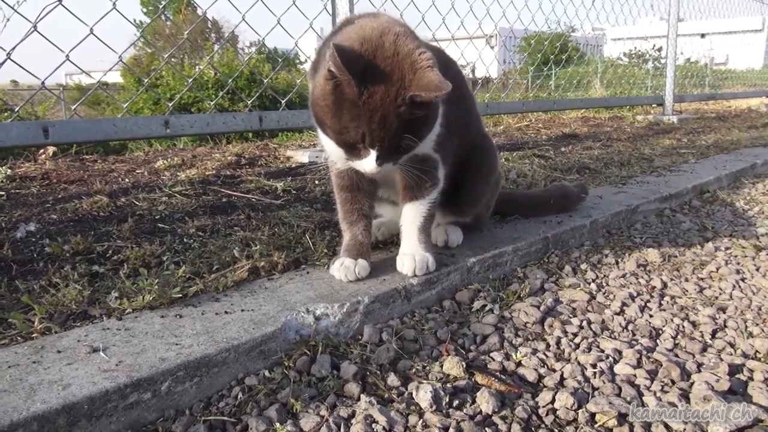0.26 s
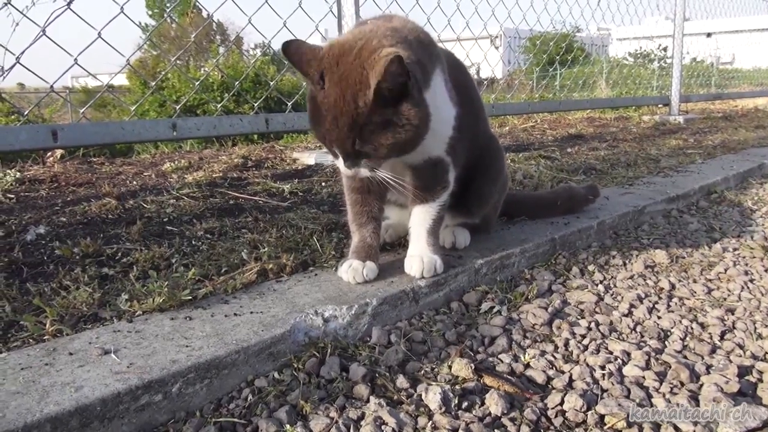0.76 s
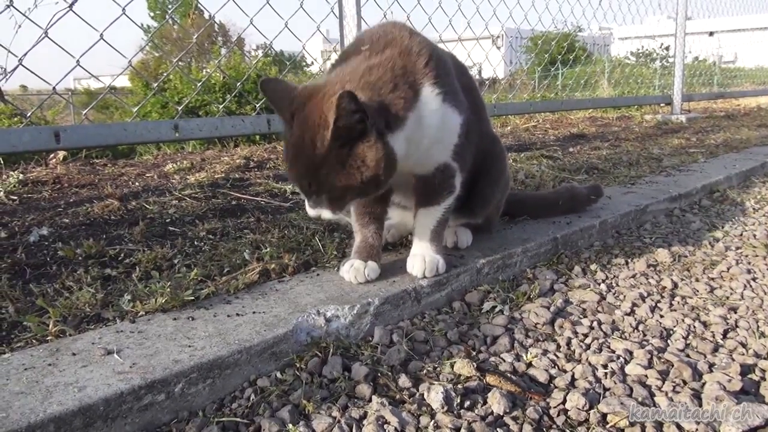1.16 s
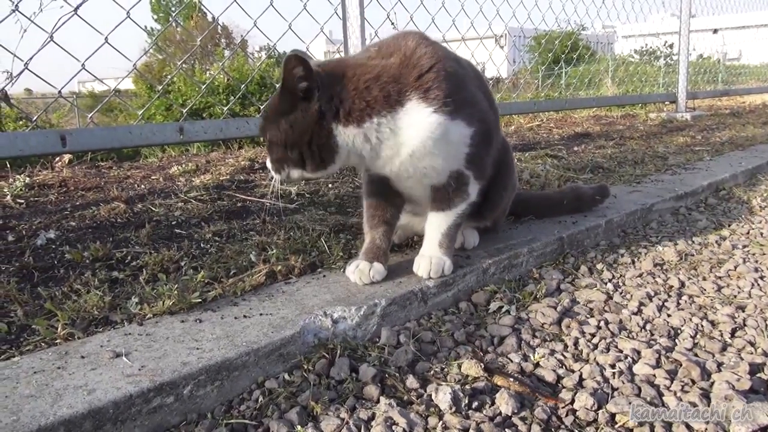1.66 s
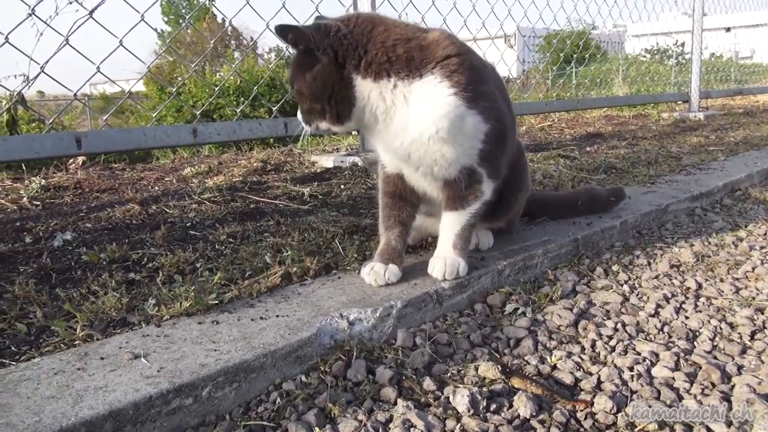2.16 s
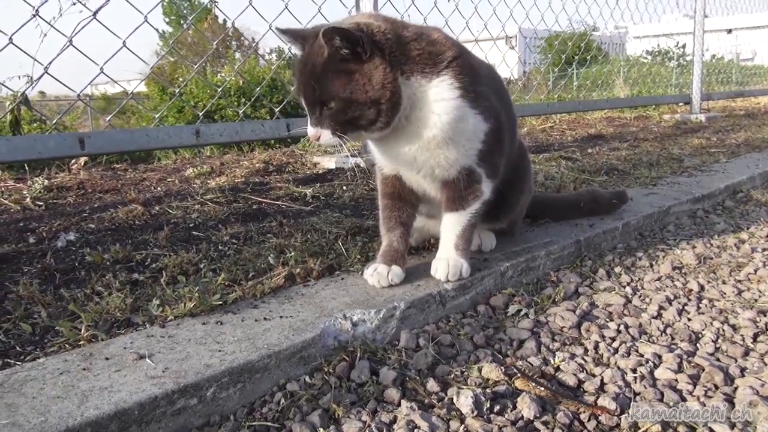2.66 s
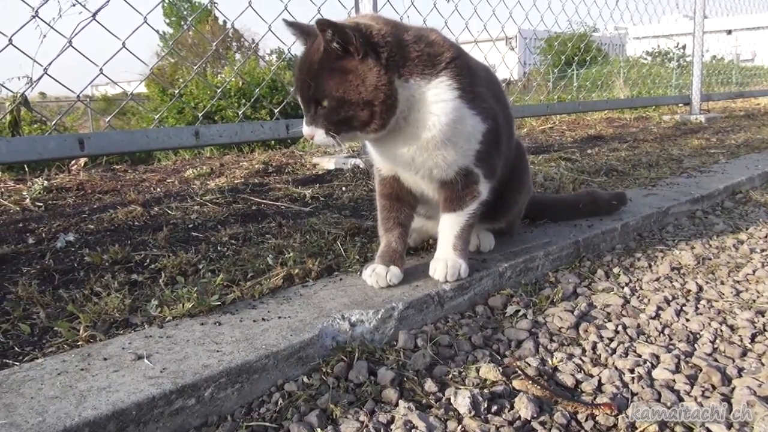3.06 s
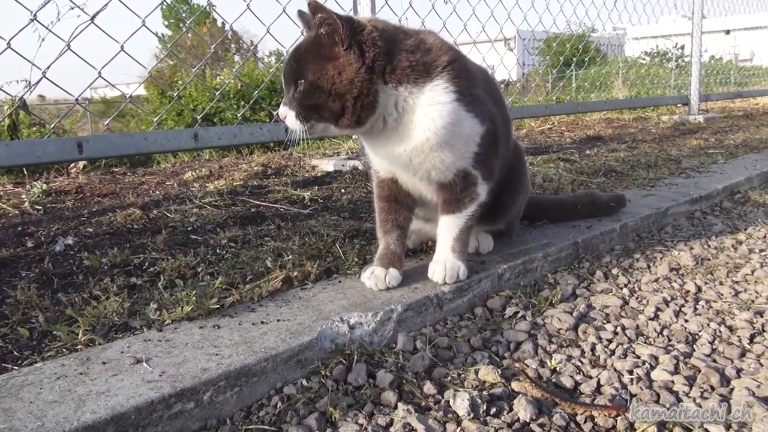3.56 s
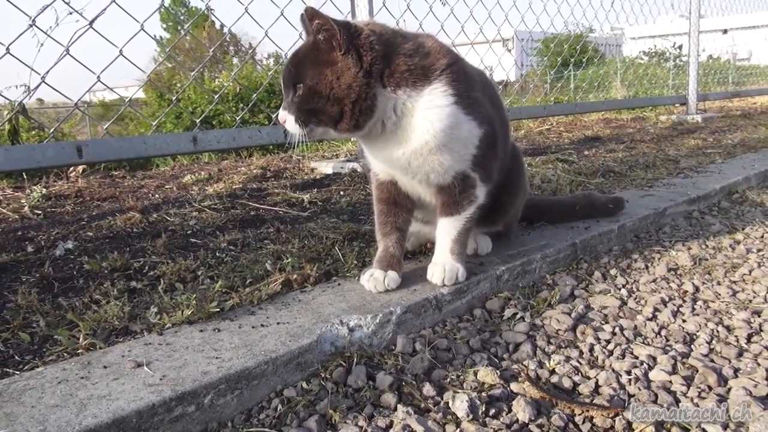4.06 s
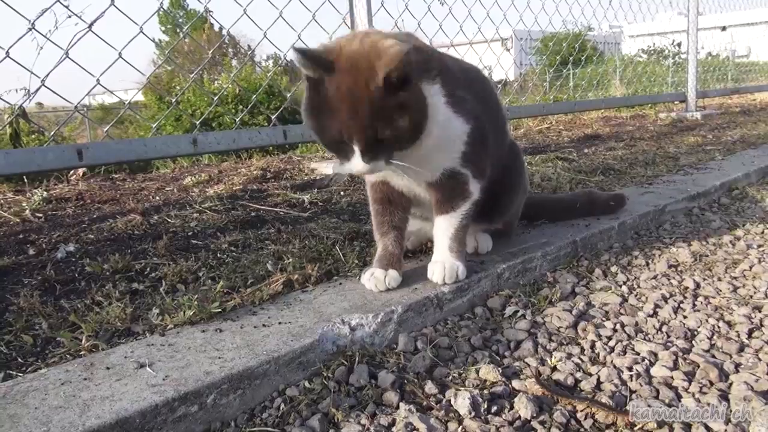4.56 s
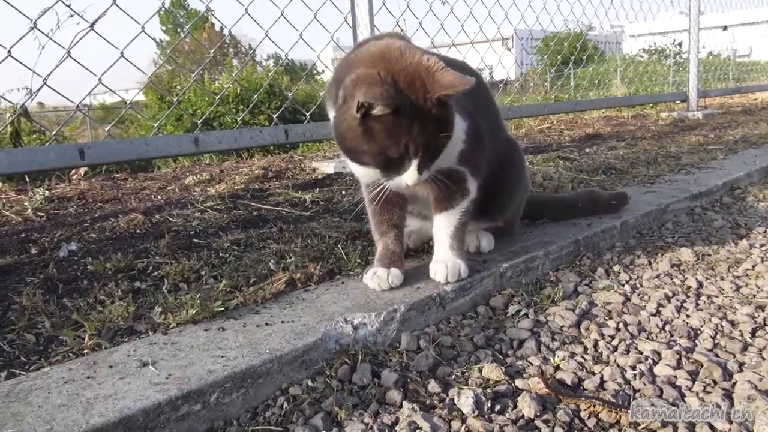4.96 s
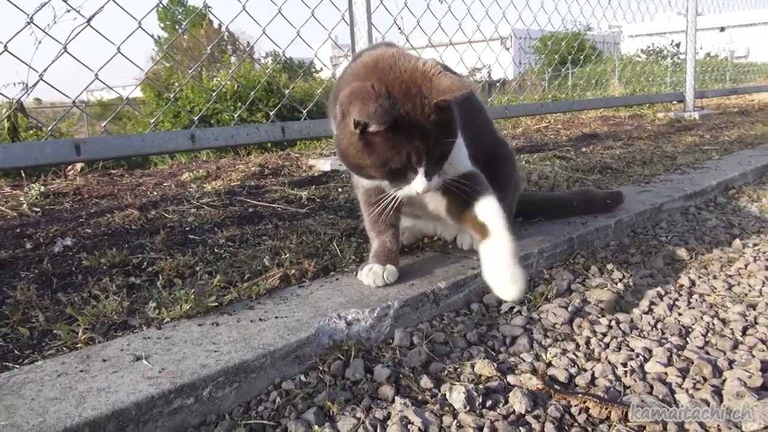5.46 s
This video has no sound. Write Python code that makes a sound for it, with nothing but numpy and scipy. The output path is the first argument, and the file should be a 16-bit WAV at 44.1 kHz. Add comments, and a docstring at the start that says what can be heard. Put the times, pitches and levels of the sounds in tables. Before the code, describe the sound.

In an open yard, low machinery hums and rumbles steadily under small birdsong. A near bird gives a burst of harsh rasping notes, a lower hoarse bird churrs, thin whistles and slurred calls slip between, then a fast even trill of buzzy falling syllables takes over for about a second. Faint chips and dry distant chatter finish. The near bird is close and clear, with a short outdoor tail; the cat is silent.

```python
"""Small birds call by a garden fence: harsh notes, a fast trill of falling syllables, a hoarser low bird,
slurred and two-note calls, single whistles and chips. Each buzz is a train of short rough pulses; each whistle
is a gliding sine, from nearly clear to strongly warbled. Hard ground reflects them and the yard adds a tail.
Behind them machinery hums and rumbles steadily, more birds chatter far away, and one dry tick sounds."""
import sys
import numpy as np
from scipy import signal
from scipy.fft import rfft, irfft
from scipy.io import wavfile
from scipy.ndimage import map_coordinates

SR = 44100
rng = np.random.default_rng(int(sys.argv[2]) if len(sys.argv) > 2 else 0)


def output_pcm(signal):
    """Save a mono or channel-first signal as 16-bit PCM at the path in sys.argv[1].

    Samples are clipped to [-1, 1] before scaling.
    """
    pcm = np.clip(np.atleast_2d(signal).T, -1, 1) * 32767
    wavfile.write(sys.argv[1], SR, np.round(pcm).astype(np.int16))


N = 251370
TIME = np.arange(N) / SR
FREQS = np.maximum(np.fft.rfftfreq(N, 1 / SR), 1)

# course of a harsh note: (share of length, pitch ratio, level [dB], pulse rate ratio)
RASP_SHAPE = [(0, 1.03, 1, .8), (.3, 1, -0.5, 1), (.75, 1.01, -3, 1.08), (1, 1.1, -10, 1.4)]


def undb(db):
    """Decibels to gain."""
    return 10 ** (np.asarray(db) / 20)


def level(x, db):
    """Scale to an rms level."""
    return x * undb(db) / np.sqrt(np.mean(x ** 2))


def spectrum(points):
    """Interpolate (frequency [Hz], level [dB]) points on a log-frequency axis."""
    hz, db = np.transpose(points)
    return np.interp(np.log(FREQS), np.log(hz), db)


def noise(gain):
    """Gaussian noise shaped by a gain per frequency, rms 1."""
    return level(irfft(rfft(rng.standard_normal(N)) * gain, N), 0)


def wander(size, hz):
    """Smooth random curve of spread about 1, with hz random knots a second."""
    knots = np.arange(size) * hz / SR
    return map_coordinates(rng.standard_normal(1024), [knots], order=3, mode="wrap")


def pan(x, db):
    """Place a sound by its left minus right level."""
    return x * undb(np.array([[db], [-db]]) / 2)


def add(out, start_s, x):
    """Mix a sound in at a time."""
    i = max(int(start_s * SR), 0)
    out[..., i:i + x.shape[-1]] += x[..., :max(N - i, 0)]


def machinery():
    """Wavering motor tones, rumble and ringing bands of rushing air, with a soft hiss over everything."""
    # motor tones: (frequency [Hz], mean level [dB])
    tones = [(36.5, -60.5), (67, -58.5), (93.5, -54), (132, -44.5), (162, -50.5), (179, -51.5), (239, -56),
             (299, -63.5), (432, -69), (649, -68)]
    # ringing bands of rushing air: (frequency [Hz], -3 dB width [Hz], level [dB])
    air_bands = [(712, 79, -66), (1170.5, 95, -68), (1278, 86, -73.5), (1472.6, 103, -65.5),
                 (1787, 290, -76)]
    # noise spectra: (frequency [Hz], relative density [dB])
    rumble_spectrum = [(13, -46), (22, -16.5), (75, -2.5), (135, -3), (205, -8.5), (233, -10.5),
                       (261, -13.5), (302, -13.5), (385, -20.5), (431, -20.5), (499, -25), (668, -27),
                       (824, -33.5), (1050, -41.5), (1360, -85), (2310, -120)]
    hiss_spectrum = [(900, -1), (2000, -1.5), (3000, -2.5), (5000, -8.5), (7000, -11.5), (10500, -14),
                     (11300, -9), (12000, -12.5), (12550, -10.5), (13200, -13), (15500, -18)]
    # stereo balance: (frequency [Hz], left minus right [dB])
    lean_curve = [(60, 0), (110, 2.0), (200, 3.5), (380, 1.5), (700, -5.5), (1290, 2.5), (2380, -4),
                  (4400, 3), (8120, -1), (15000, -0.5)]
    # stereo width: (frequency [Hz], side minus mid [dB])
    width_curve = [(40, -39), (150, -21), (300, -21), (700, -10.5), (1400, -10.5), (4000, -15), (8000, 0),
                   (10300, -5), (11800, -20)]
    rumble_db, hiss_db = -39, -67.5
    waver_db, drift_hz = 2, .486

    hum = np.zeros(N)
    for hz, db in tones:
        phase = 2 * np.pi * np.cumsum(hz + drift_hz * wander(N, 2.99)) / SR
        hum += np.sqrt(2) * np.sin(phase) * undb(db + waver_db * wander(N, 4.056))

    beds = []
    for _ in range(2):  # independent noise for mid and side
        bed = undb(rumble_db) * noise(undb(spectrum(rumble_spectrum)))
        bed += undb(hiss_db) * noise(undb(spectrum(hiss_spectrum)))
        for hz, width_hz, db in air_bands:
            bed += undb(db) * noise(1 / (1 + (2 * (FREQS - hz) / width_hz) ** 4) ** .5)
        beds.append(bed)

    mid = rfft(beds[0] + hum)
    side = rfft(beds[1]) * undb(spectrum(width_curve))
    lean = undb(spectrum(lean_curve) / 2)
    return irfft(np.array([(mid + side) * lean, (mid - side) / lean]), N)


def scatter(x, t60_s, rise_s, spread, top_hz):
    """Diffuse tail: low-passed noise that builds up and decays, unit energy in mid before the low-pass."""
    t = TIME[:SR]
    envelope = undb(-60 * t / t60_s) * (1 - np.exp(-t / rise_s))
    mid, side = rng.standard_normal((2, SR)) * envelope
    low_pass = signal.butter(2, top_hz, fs=SR, output="sos")
    tail = signal.sosfilt(low_pass, np.array([mid + spread * side, mid - spread * side]))
    return signal.fftconvolve(x, tail / np.sqrt(np.sum(mid ** 2)), axes=1)[:, :N]


def yard(x):
    """Hard ground reflects each call at once; gravel and fence scatter it, far walls add a duller tail."""
    lag_s, bounce_gain = .00124, .38
    early_db, late_db = -14, -10.5
    direct = irfft(rfft(x) * (1 + bounce_gain * np.exp(-2j * np.pi * FREQS * lag_s)), N)
    early = scatter(x, t60_s=.08, rise_s=.0027, spread=.77, top_hz=8650)
    late = scatter(x, t60_s=.77, rise_s=.0069, spread=.072, top_hz=4830)
    return direct + undb(early_db) * early + undb(late_db) * late


def tick():
    """A brief bright crackle, as of a dry stalk or pebble: decaying band-passed noise."""
    # (time [s], decay to 1/e [s], level [dB])
    ticks = [(1.622, 0.0079, -61)]
    high_pass = FREQS ** 2 / (FREQS ** 2 + 3000 ** 2)
    low_pass = 1 / (1 + (FREQS / 11000) ** 4)
    out = np.zeros(N)
    for start_s, decay_s, db in ticks:
        add(out, start_s, undb(db) * noise(high_pass * low_pass) * np.exp(-TIME / decay_s))
    return out


def whistle(length_s, first_hz, middle_hz, last_hz, depth):
    """A sine on a parabolic pitch arch, with a fast warble that weakens it as the pitch rises."""
    size = int(length_s * SR)
    arch = np.polyfit([0, .5, 1], [first_hz, middle_hz, last_hz], 2)
    warble_hz = 160 * (1 + .24 * wander(size, 92.6))
    warble = np.sin(2 * np.pi * np.cumsum(warble_hz) / SR)
    hz = np.polyval(arch, np.arange(size) / size) * (1 + depth * warble + .0089 * wander(size, 917))
    flutter_db = .55 * wander(size, 100) - 31 * depth * warble
    strength = signal.windows.tukey(size, .4) * undb(flutter_db)
    return np.sqrt(2) * strength * np.sin(2 * np.pi * np.cumsum(hz) / SR)


def buzz(shape, length_s, hz, rate, sweep, rough, gate, second_db, third_db,
         rasp_start_db, rasp_ratio, rasp_hz, scatter_db=1.64, clearing_db=0):
    """One note: the syrinx opens in pulses, each a short unsteady tone roughened by chaotic vibration."""
    size = int(length_s * SR)
    u = np.arange(size) / size
    share, *columns = np.transpose(shape)
    pitch, db, pace = (np.interp(u, share, column) for column in columns)
    cycle = np.cumsum(rate * pace) / SR % 1

    # pitch settles from above in each pulse, flutters irregularly and varies from pulse to pulse
    bend = sweep * (1 - cycle) ** 3 + rough * wander(size, 2210) + .015 * wander(size, rate)
    phase = 2 * np.pi * np.cumsum(hz * pitch * np.exp(bend)) / SR

    # chaotic vibration: a noise band that follows the pitch and may clear over the note
    chaos = (wander(size, rasp_hz) + 1j * wander(size, rasp_hz)) / np.sqrt(2)
    rasp = undb(rasp_start_db - clearing_db * u) * chaos
    swing = np.exp(1j * phase) + rasp * np.exp(1j * rasp_ratio * phase)
    voice = 2 * swing / np.sqrt(1 + np.abs(swing) ** 2)  # the membranes can only swing so far

    for k, overtone_db in ((2, second_db), (3, third_db)):
        tone = np.exp(1j * k * phase) * (1 + rasp)
        band = undb(-1.5) * rasp * np.exp(1j * k * rasp_ratio * phase)
        voice = voice + undb(overtone_db) * (tone + band)

    # each pulse opens faster than it closes
    opening = np.sin(np.pi * cycle ** .55) ** gate * signal.windows.tukey(size, .03)
    return np.imag(voice) * opening * undb(db + scatter_db * wander(size, rate))


def phrase(notes, shape, second_db, third_db, gate, blur_per_db=0, **voice):
    """Buzzing notes in one voice; soft ones are duller and their pulses may run together."""
    loud_db = -39  # overtones keep their set level at this note level
    dulling = .52  # overtone loss per dB softer [dB/dB]
    out = np.zeros(N)
    for start_s, length_s, hz, rate, db, swell_db in notes:
        softness_db = db - loud_db
        dull_db = dulling * softness_db
        depth = gate * np.clip(2 + blur_per_db * softness_db, .25, 1)
        pace = rate * (1 + .0084 * rng.standard_normal())
        note = buzz(shape, length_s, hz, pace, gate=depth, second_db=second_db + dull_db,
                    third_db=third_db + dull_db, **voice)
        add(out, start_s, note * undb(db + swell_db * np.linspace(-.5, .5, len(note))))
    return out


def far_flock():
    """Many faint chips, each a short glide within a longer rough buzz set somewhat lower, that run together;
    louder chips carry relatively more buzz."""
    # (time [s], level [dB])
    flock_level = [(0, -91), (.7, -68.5), (2.1, -66), (2.6, -80), (4.5, -75), (4.9, -74), (5.25, -74.5),
                   (5.6, -83)]
    count, buzz_db = 200, -2
    out = np.zeros(N)
    for k, (when, span, pitch, slope, loud) in enumerate(rng.random((count, 5))):
        start_s = (k + when) / count * N / SR
        hz = 4350 * (.82 + .3 * pitch)
        glide = .393 * slope - .16
        chip = whistle(.008 + .019 * span, hz * (1 + glide), hz, hz * (1 - glide), depth=.016)
        rough = buzz(RASP_SHAPE, .0603, hz, 100, sweep=0, rough=.086, gate=.57, second_db=-41,
                     third_db=-45, rasp_start_db=13, rasp_ratio=.97, rasp_hz=2001)
        add(out, start_s, undb(3.3 * loud) * chip)
        add(out, start_s, undb(buzz_db + 4.8 * loud) * rough)
    return pan(level(out, 0) * undb(np.interp(TIME, *np.transpose(flock_level))), .91)


def far_chatter():
    """A distant bird ticks drily: every note is about one rough pulse."""
    # (time [s], level [dB])
    chatter = [(4.869, -62.5), (4.903, -64), (4.913, -63), (4.949, -71), (4.992, -63.5), (5.031, -67),
               (5.112, -69), (5.152, -66), (5.237, -65.5), (5.283, -65), (5.377, -67.5), (5.42, -68)]
    note_s, hz = .014, 3410
    notes = [(start_s, note_s, hz, 1 / note_s, db, 0) for start_s, db in chatter]
    out = phrase(notes, RASP_SHAPE, sweep=.1, rough=.051, gate=.9, second_db=-28, third_db=-45,
                 rasp_start_db=5.5, rasp_ratio=1.3, rasp_hz=1500)
    return pan(out, 1.7)


def glides(notes):
    """Single whistles, each bending through three pitches."""
    out = np.zeros(N)
    for start_s, length_s, first_hz, middle_hz, last_hz, db, depth in notes:
        add(out, start_s, undb(db) * whistle(length_s, first_hz, middle_hz, last_hz, depth))
    return out


def call(times, notes):
    """A call of a few whistled notes, given at each (time [s], length ratio, level [dB])."""
    out = np.zeros(N)
    for start_s, stretch, db in times:
        for delay_s, length_s, first_hz, middle_hz, last_hz, note_db, depth in notes:
            note = whistle(stretch * length_s, first_hz, middle_hz, last_hz, depth)
            add(out, start_s + stretch * delay_s, undb(db + note_db) * note)
    return out


def chips():
    """Clear gliding chips with hardly any warble."""
    # (time [s], length [s], start [Hz], middle [Hz], end [Hz], level [dB])
    chip_notes = [(.088, .036, 3600, 4270, 5230, -71), (.265, .045, 3800, 4300, 3600, -73),
                  (.405, .03, 2120, 1800, 1650, -67), (.45, .041, 4940, 4800, 4700, -75),
                  (.535, .02, 1880, 1730, 1620, -64), (.548, .02, 3600, 4400, 5100, -66),
                  (.552, .025, 2530, 2540, 2400, -53.5), (.578, .022, 1880, 1686, 1560, -62),
                  (.695, .028, 3700, 4100, 4900, -69), (1.52, .042, 2100, 2380, 2500, -69),
                  (2.436, .02, 4070, 4600, 4700, -69), (2.463, .018, 4400, 4620, 4300, -68),
                  (2.974, .025, 4150, 4420, 4500, -63), (3.655, .038, 3600, 3640, 3520, -58.5),
                  (3.965, .038, 3600, 3560, 3630, -57.5), (4.338, .039, 4570, 4670, 4900, -70),
                  (4.38, .036, 4770, 4410, 4200, -68), (4.445, .028, 4850, 4040, 2950, -69),
                  (4.552, .034, 2630, 2720, 2730, -65), (4.68, .056, 3950, 4250, 4600, -74),
                  (4.79, .018, 4600, 4300, 4100, -71), (4.84, .026, 4900, 4700, 4000, -72),
                  (4.9, .026, 4650, 4550, 4150, -67), (4.995, .051, 4540, 4500, 4750, -68),
                  (5.043, .029, 4900, 5400, 5700, -75), (5.16, .025, 4500, 4480, 4350, -73),
                  (5.315, .02, 4400, 4250, 4100, -72), (5.545, .055, 3850, 3830, 3920, -76),
                  (5.675, .028, 4330, 4300, 4250, -69)]
    warble_share = .0065  # of pitch
    return pan(glides([(*note, warble_share) for note in chip_notes]), 1)


def single_whistles():
    """Single whistles, mostly high, some lower and falling, from nearly clear to strongly warbled."""
    # (time [s], length [s], start [Hz], middle [Hz], end [Hz], level [dB], warble [share of pitch])
    whistle_notes = [(.725, .055, 5970, 5580, 5350, -64, .086),
                     (1.021, 0.043, 5450, 5700, 6140, -56, 0.034),
                     (1.031, 0.045, 6500, 6220, 6750, -53.5, .018),
                     (1.396, 0.028, 6460, 6540, 6260, -59.5, 0.026),
                     (1.42, 0.036, 6150, 6200, 6380, -59.5, .012),
                     (1.546, .066, 4320, 3850, 3750, -58, .067),
                     (1.555, .05, 3455, 3275, 3200, -56.5, .032), (1.72, .04, 4210, 4130, 3920, -56.5, .04),
                     (1.735, .047, 3460, 3360, 3210, -58, .027),
                     (2.828, 0.04, 6150, 5960, 6150, -59.5, .045),
                     (2.853, .04, 6100, 6100, 6000, -67, .015),
                     (2.883, 0.048, 5950, 5800, 5770, -55.5, .01),
                     (3.436, .028, 6300, 6340, 6350, -70, .008)]
    return pan(glides(whistle_notes), -.9)


def two_note_calls():
    """A clear call from the left, high then low, evenly repeated."""
    # (delay [s], length [s], start [Hz], middle [Hz], end [Hz], level [dB], warble [share of pitch])
    call_notes = [(0, 0.025, 6000, 6210, 5800, -0.038, 0.0073), (.026, .056, 4350, 4070, 4350, -.5, 0.036)]
    start_s, every_s, db = 2.655, .133, -63.5
    repeats = [(start_s + k * every_s, 1, db) for k in range(3)]
    return pan(call(repeats, call_notes), 8.5)


def slurred_calls():
    """A buzzy warbled call that slides down and hooks up again."""
    # (delay [s], length [s], start [Hz], middle [Hz], end [Hz], level [dB], warble [share of pitch])
    slur_notes = [(0, 0.024, 6050, 5900, 5700, -2.5, 0.03), (.012, 0.038, 5500, 5000, 4600, -.5, 0.13),
                  (.033, 0.056, 4250, 3870, 4280, 1, 0.062)]
    # (time [s], length ratio, level [dB])
    slur_times = [(0, .8, -67.5), (.122, .88, -67.8), (.618, .95, -66.3), (.724, .9, -64.5),
                  (1.41, 1.05, -62), (2.093, 1.08, -62.8), (2.24, 1.03, -62.8)]
    return pan(call(slur_times, slur_notes), .3)


def hoarse_bird():
    """A lower, hoarser bird churrs, its pulses quickening as it warms up."""
    # course of a note: (share of length, pitch ratio, level [dB], pulse rate ratio)
    churr_shape = [(0, .96, -6, 0.97), (.25, .99, 1.5, 0.94), (0.601, 1.02, 4, 0.96), (.8, .94, 4.5, 0.93),
                   (1, .74, -8, 1)]
    # (time [s], length [s], pitch [Hz], level [dB])
    churr_notes = [(0.146, 0.073, 2400, -71), (0.33, 0.048, 2670, -61.3), (.393, .015, 2750, -60),
                   (0.484, 0.047, 2695, -55), (0.542, 0.05, 2560, -60), (1.092, 0.056, 2480, -61),
                   (1.24, 0.022, 2530, -59), (1.655, 0.05, 2620, -54), (1.783, .04, 2610, -61),
                   (1.819, 0.058, 2605, -54), (1.938, 0.052, 2570, -59), (1.993, 0.063, 2603, -54),
                   (2.069, 0.026, 2510, -62), (2.165, 0.06, 2680, -52), (2.332, .073, 2597, -52.5),
                   (2.421, 0.018, 2440, -66), (2.525, 0.07, 2617, -51.5), (3.125, 0.038, 2410, -61.5),
                   (3.166, 0.048, 2370, -62), (3.305, 0.064, 2340, -61.5), (4.545, 0.065, 2950, -68.5)]
    # (time [s], base pulse rate [1/s])
    churr_pace = [(.3, 58), (1.8, 78)]
    pace_s, pace_per_s = np.transpose(churr_pace)
    notes = [(start_s, length_s, hz, np.interp(start_s, pace_s, pace_per_s), db, 0)
             for start_s, length_s, hz, db in churr_notes]
    churrs = phrase(notes, churr_shape, sweep=.035, rough=.06, gate=1.15, second_db=-15, third_db=-39,
                    rasp_start_db=0, rasp_ratio=.98, rasp_hz=1049)
    return pan(churrs, .36)


def near_bird():
    """Rasps and trills, filtered by throat and open beak: mostly the near bird, while the softest rasps come
    from a second bird farther off."""
    # harsh notes: (time [s], length [s], pitch [Hz], level [dB])
    rasp_notes = [(0.744, 0.05, 3400, -60), (0.791, 0.06, 3280, -44.7), (0.886, 0.02, 3400, -59),
                  (.912, 0.053, 3220, -43.3), (1.047, 0.052, 3230, -49.7), (1.124, 0.026, 3300, -58),
                  (1.153, .072, 3250, -42), (1.222, 0.054, 3230, -52), (1.281, 0.055, 3200, -43.5),
                  (1.377, 0.066, 3230, -53), (3.778, 0.035, 3400, -57), (4.099, 0.07, 3400, -56)]
    # falling syllables, two alone then a run: (time [s], pitch [Hz], level [dB], swell start to end [dB])
    trill_notes = [(1.540, 3300, -50.8, -5), (1.716, 3250, -55.2, -3), (3.083, 3170, -44.5, -1),
                   (3.182, 3264, -45, -1), (3.2905, 3260, -45, -2), (3.3855, 3300, -46, -1),
                   (3.485, 3230, -45.5, -8), (3.5935, 3360, -46.7, -3), (3.689, 3340, -46.5, -3),
                   (3.7995, 3420, -46, 0), (3.9065, 3340, -46, -3), (4.018, 3400, -46.7, -3),
                   (4.1365, 3346, -47, -2)]
    # course of a syllable: (share of length, pitch ratio, level [dB], pulse rate ratio)
    trill_shape = [(0, 1.22, -13, 1.51), (.25, 1.23, -3, 1.33), (.55, 1.06, .5, .88), (.8, 1, 1.5, .81),
                   (.89, .98, -4, .83), (1, .94, -8, .85)]
    # throat and beak response: (frequency [Hz], gain [dB])
    beak = [(1900, -24), (2600, 3), (3000, 2.5), (3270, 1), (3750, -1.3), (4200, -4.2), (4850, -1.8),
            (5200, -8.5), (5600, -6), (6500, -6), (8000, -7), (9700, -.6), (12000, -3.8), (15000, -16)]
    rasp_rate, trill_rate = 100, 106  # base pulse rates [1/s]
    syllable_s, blur_per_db = .069, .07

    rasps = phrase([(start_s, length_s, hz, rasp_rate, db, 0) for start_s, length_s, hz, db in rasp_notes],
                   RASP_SHAPE, sweep=.048, rough=.048, gate=.9, blur_per_db=blur_per_db,
                   second_db=-18.5, third_db=-19.5, rasp_start_db=3, rasp_ratio=1.33, rasp_hz=1598)
    trill = phrase([(start_s, syllable_s, hz, trill_rate, db, swell_db)
                    for start_s, hz, db, swell_db in trill_notes],
                   trill_shape, sweep=.07, rough=.05, gate=1.45, blur_per_db=blur_per_db,
                   second_db=-19.5, third_db=-21.5, rasp_start_db=5.75, rasp_ratio=1.22, rasp_hz=1552,
                   clearing_db=5.5, scatter_db=2)
    return irfft(rfft(pan(rasps, .64) + pan(trill, 1.4)) * undb(spectrum(beak)), N)


def scene():
    """Birds in the yard over the machinery."""
    far = far_flock() + far_chatter()
    whistlers = chips() + single_whistles() + two_note_calls() + slurred_calls()
    buzzers = hoarse_bird() + near_bird()
    return machinery() + yard(tick() + far + whistlers + buzzers)


def record(dry):
    """A steep low-pass cuts the top; 5 ms fades start and stop the sound without a click."""
    fade = np.clip(np.minimum(TIME, TIME[-1] - TIME) / .005, 0, 1)
    return signal.sosfilt(signal.ellip(10, .2, 80, 15500, fs=SR, output="sos"), dry * fade)


dry = scene()
out = record(dry)
output_pcm(out)
```